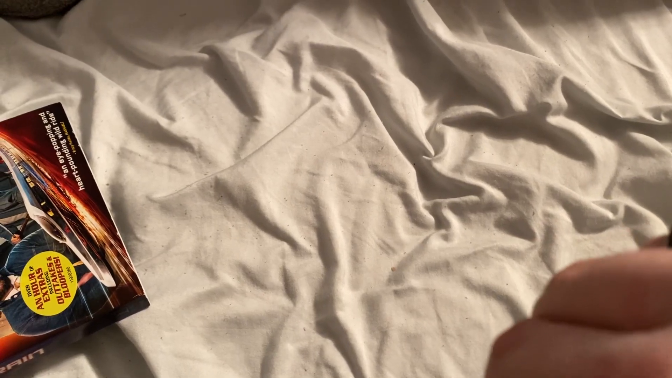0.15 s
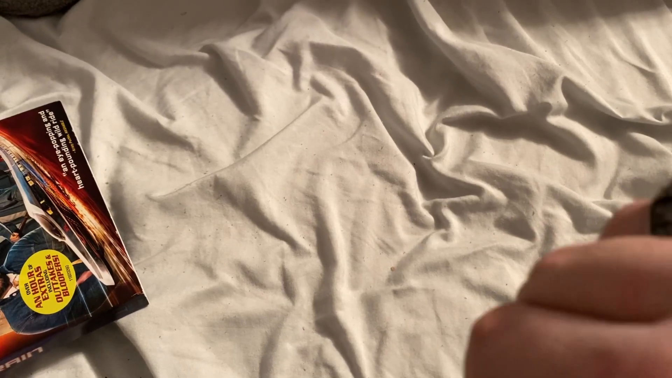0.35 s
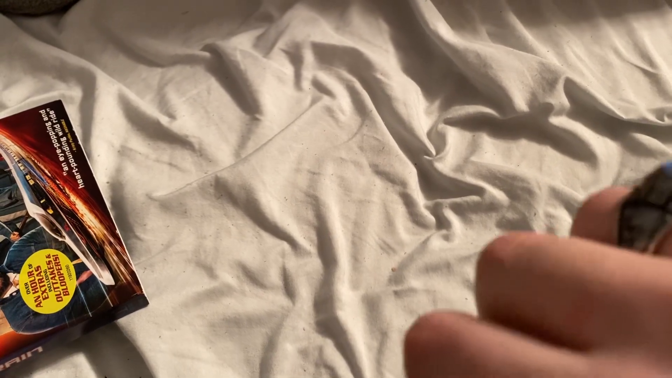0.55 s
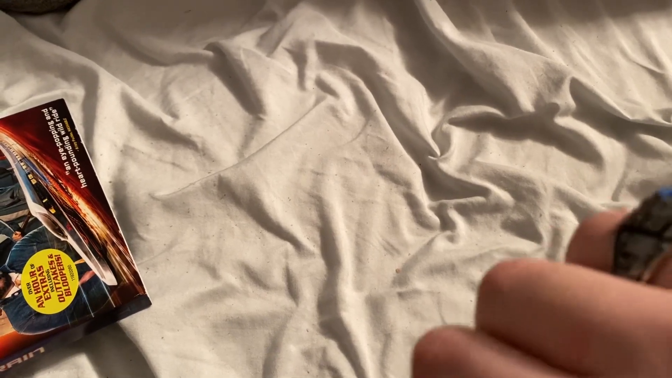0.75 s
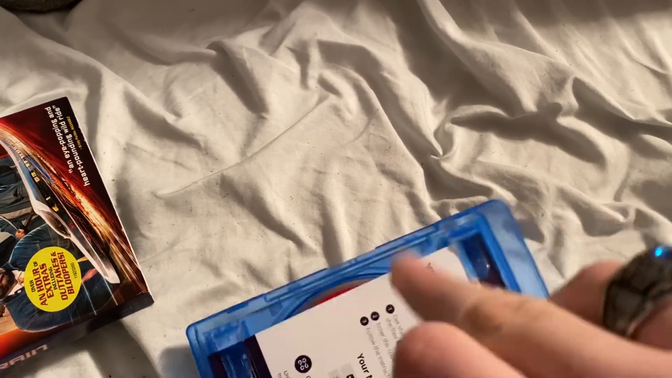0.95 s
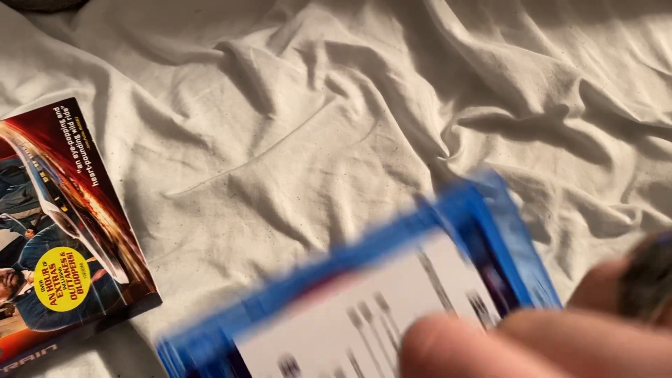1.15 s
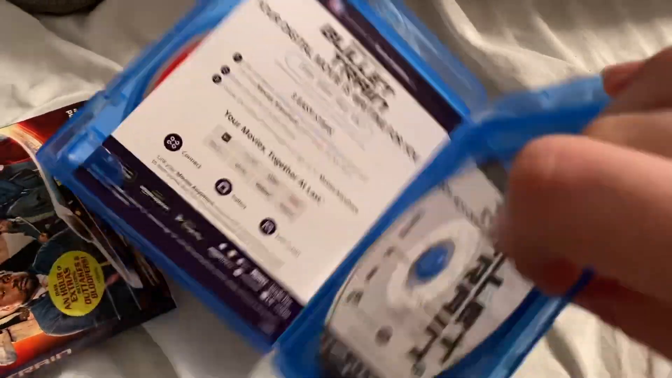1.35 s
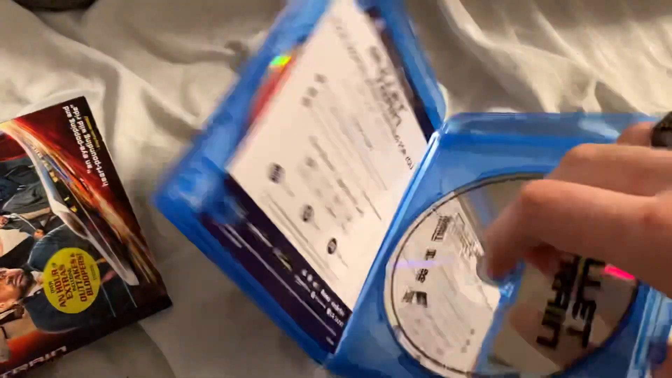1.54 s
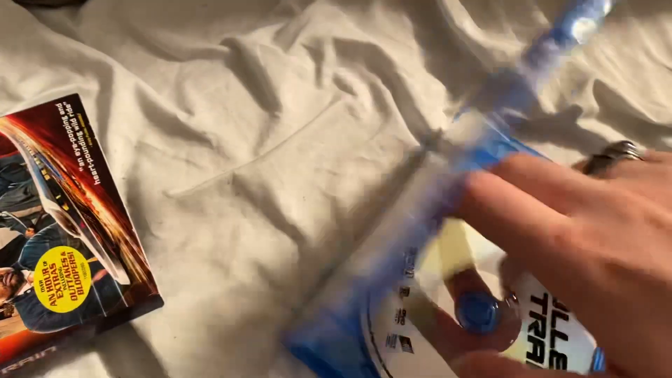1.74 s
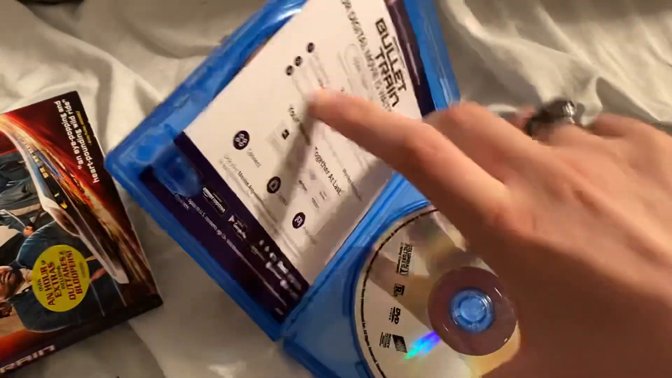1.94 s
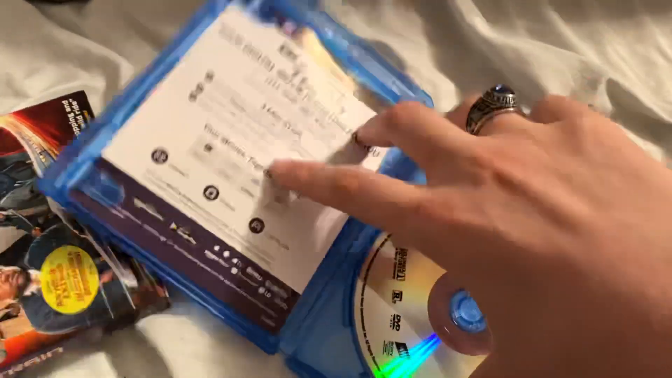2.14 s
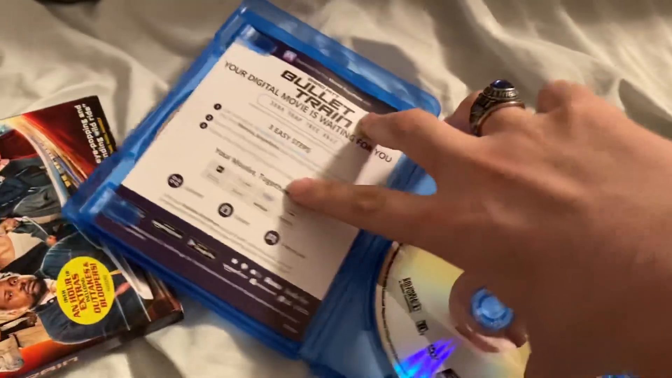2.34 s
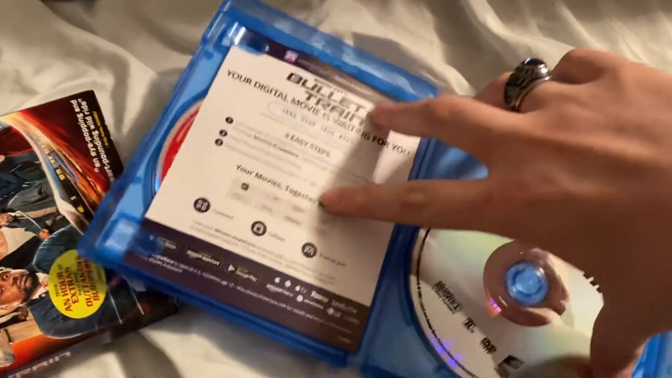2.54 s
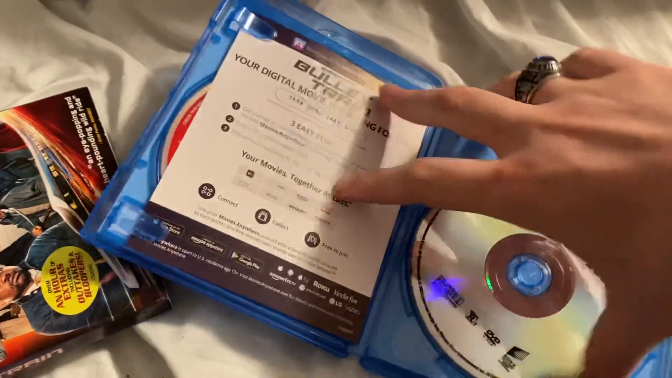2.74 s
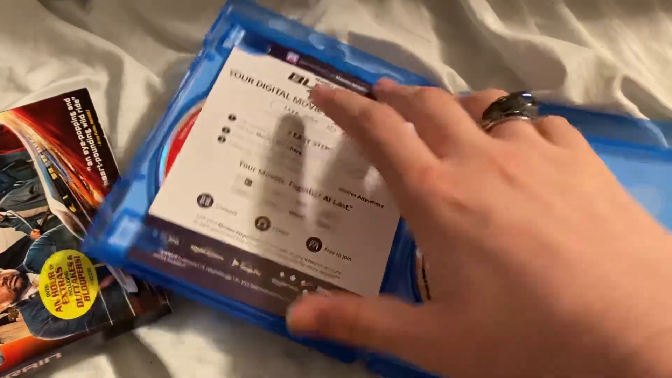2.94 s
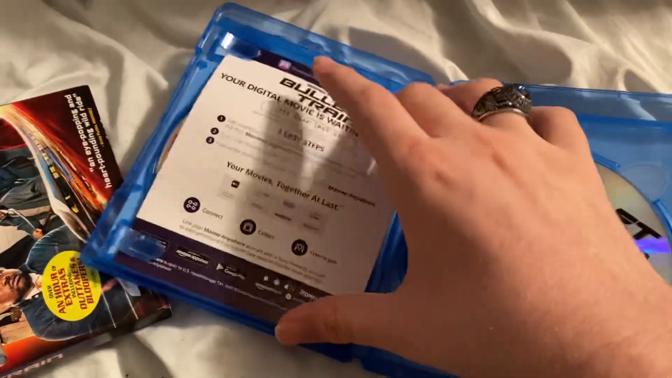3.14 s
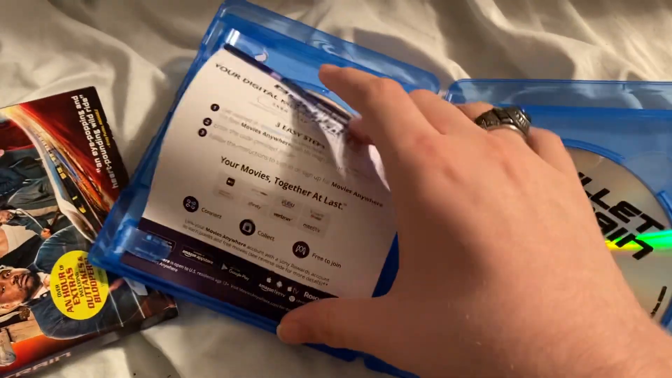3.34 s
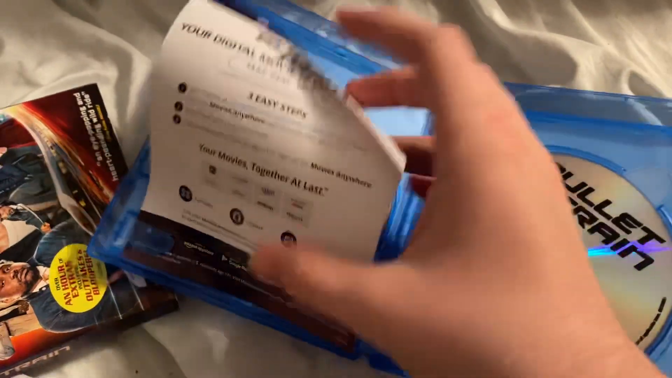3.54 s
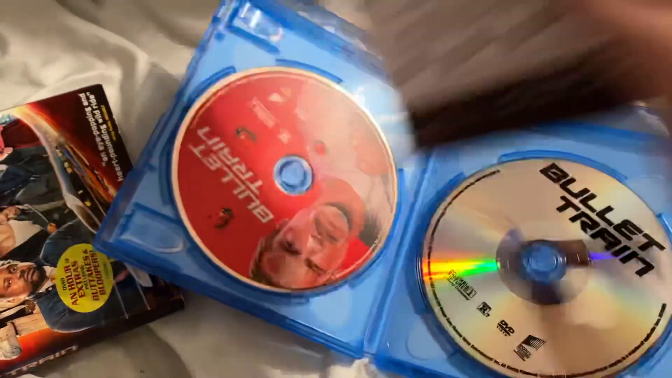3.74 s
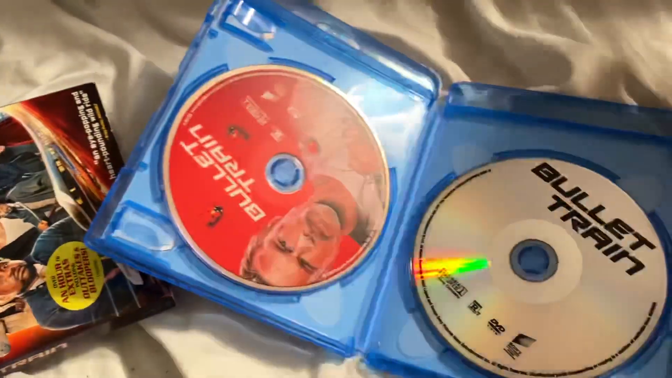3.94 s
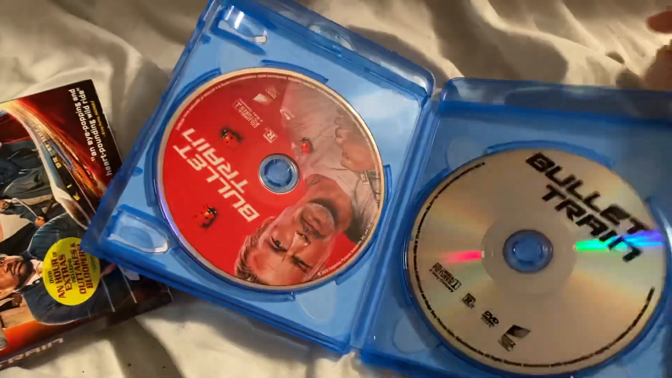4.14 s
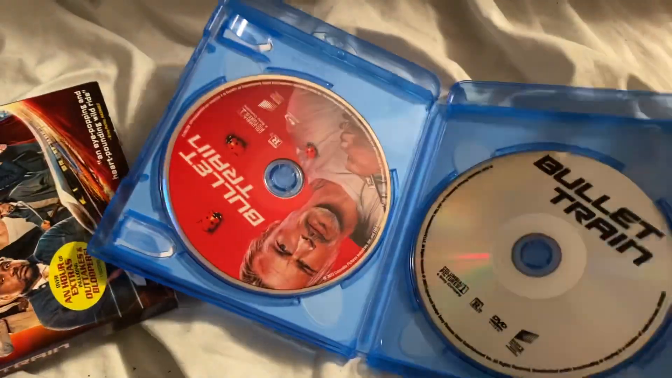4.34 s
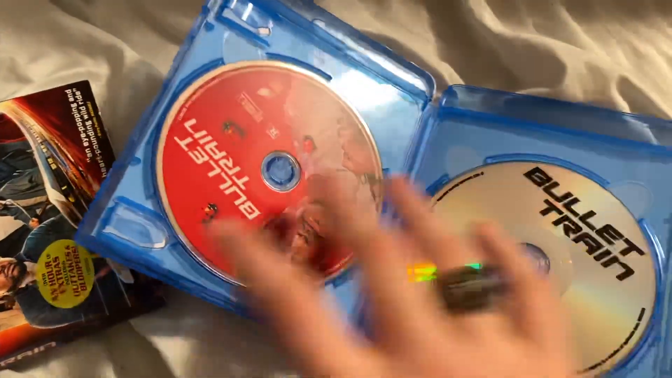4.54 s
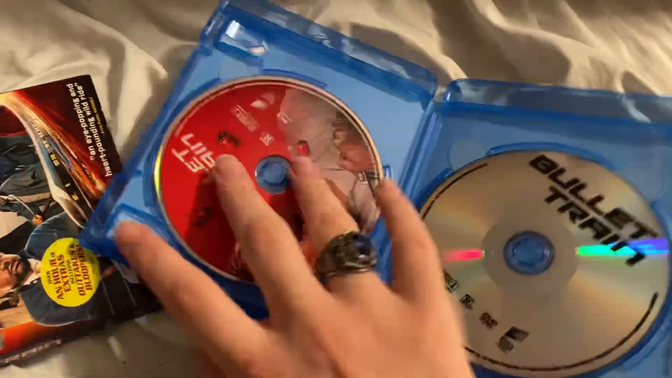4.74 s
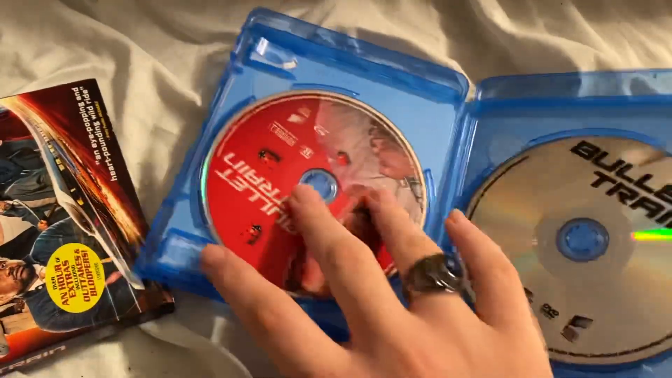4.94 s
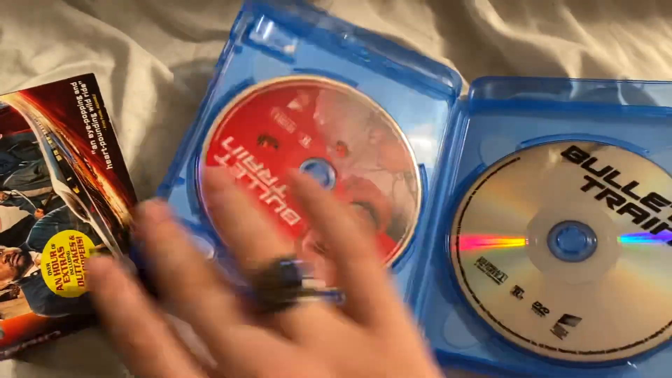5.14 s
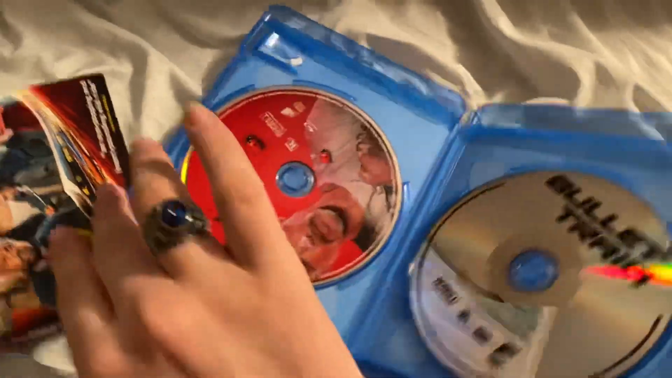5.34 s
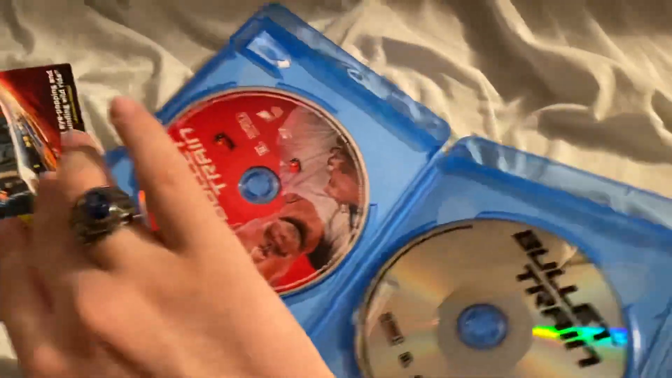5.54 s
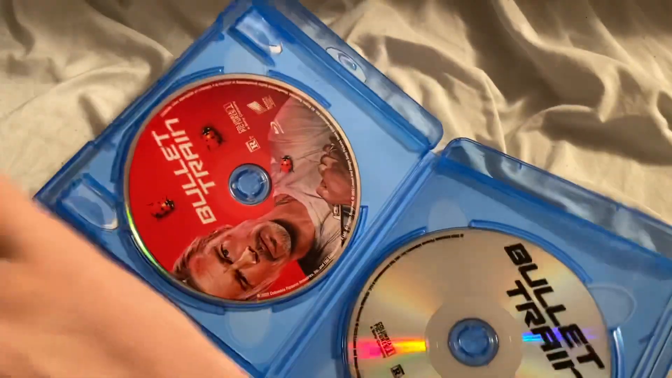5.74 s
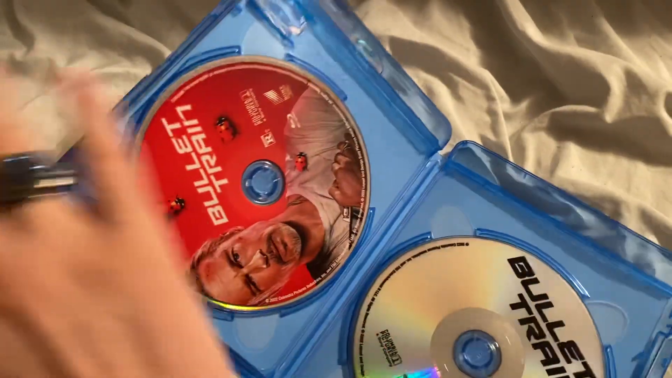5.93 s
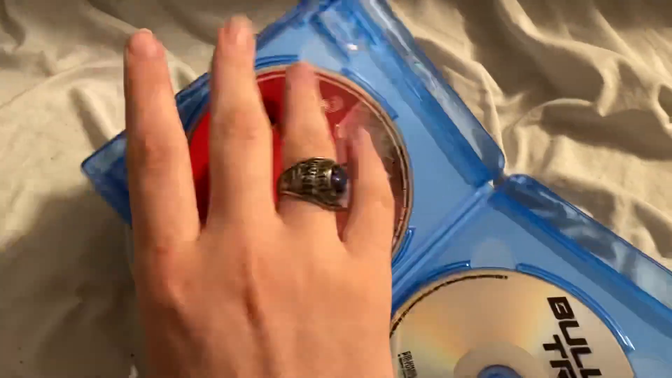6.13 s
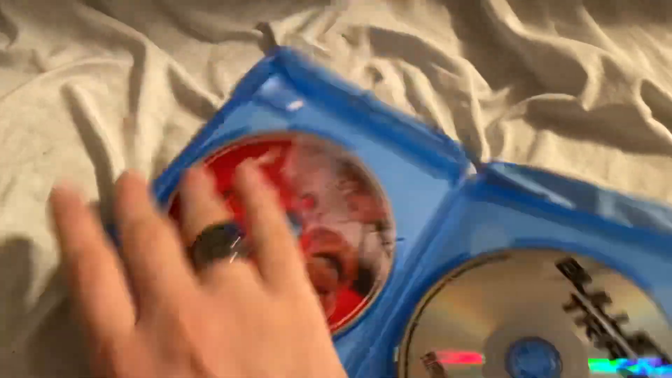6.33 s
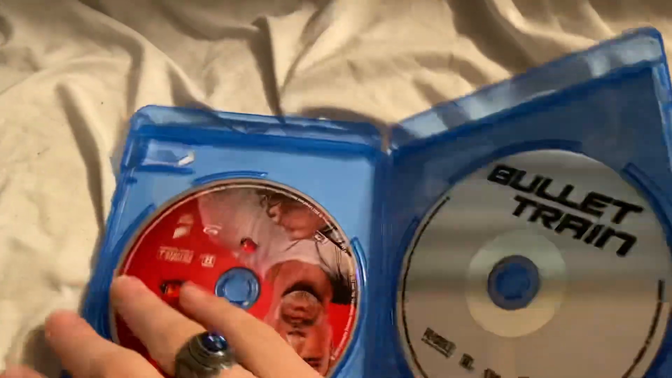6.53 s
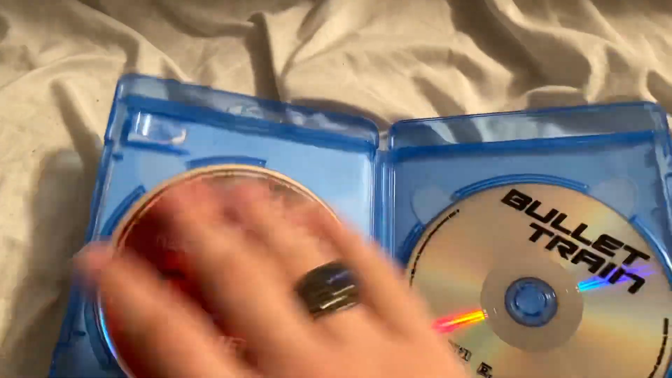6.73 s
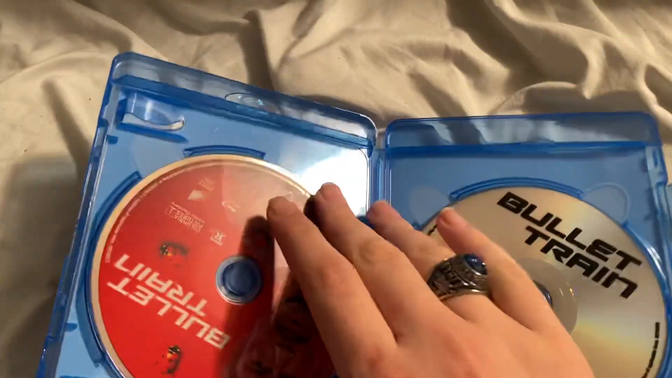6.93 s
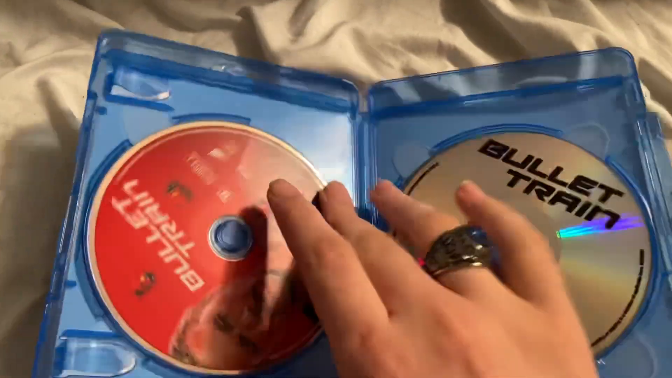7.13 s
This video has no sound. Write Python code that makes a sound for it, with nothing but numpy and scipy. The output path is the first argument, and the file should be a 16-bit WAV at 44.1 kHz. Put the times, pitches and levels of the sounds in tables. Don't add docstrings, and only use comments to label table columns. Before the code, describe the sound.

A thin plastic disc case cracks open sharply, clicks and knocks in the hands, then a stiff paper slip snaps free loudly before soft handling on bedding.

```python
import sys
import numpy as np
from scipy import signal
from scipy.fft import rfft, irfft, next_fast_len
from scipy.io import wavfile
from scipy.ndimage import uniform_filter1d

SR = 44100
rng = np.random.default_rng(int(sys.argv[2]) if len(sys.argv) > 2 else 0)


def how_loud(loudness_db):
    steps = np.asarray(loudness_db, float) / 20
    return 10 ** steps


def dump_mix(stems):
    frames = np.atleast_2d(stems).T
    limited = np.clip(frames, -1, 1)
    pcm = np.round(limited * 32767).astype(np.int16)
    wavfile.write(sys.argv[1], SR, pcm)


N = 316638
LEAD_S = 0.01

# peak t/s, level/dB, rise/s, fall/s
SHELL_STROKES = [(.15, -88, 0.43, 0.63), (2.5, -72, 0.36, 0.1), (.504, -71.5, 0.043, 0.17),
                 (.673, -75.5, 0.072, 0.34), (1.14, -71, 0.2, 0.77), (1.457, -59.5, 0.041, 0.036),
                 (1.6, -60.5, 0.059, 0.88), (1.9, -55.5, 0.1, 0.32), (2.2, -64.5, 0.23, 0.28),
                 (2.79, -70.5, 0.23, 0.61), (3.028, -68, 0.1, 0.069), (3.243, -57.5, 0.11, 0.15),
                 (3.42, -60, .12, 0.24), (3.908, -54.5, 0.0089, .05), (3.95, -97, 0.85, 0.19),
                 (3.985, -53, 0.011, 0.047), (4.128, -59, 0.067, 0.074), (4.39, -72.5, 0.17, 0.2),
                 (4.75, -66.5, 0.18, 0.68), (5.19, -62.5, 0.17, 0.43), (5.77, -68.5, 1, 0.18),
                 (6.024, -73.5, 0.074, 0.11), (6.23, -63.5, 0.47, 0.095), (6.453, -61, 0.28, 0.1),
                 (7.012, -69.5, 1, 0.33)]


def evened(x):
    return x / np.sqrt(np.mean(x ** 2) + 1e-20)


def loudest(x, size):
    return x / np.sqrt(uniform_filter1d(x ** 2, size).max() + 1e-20)


def read(points, hz):
    f, value = np.transpose(points)
    return np.interp(np.log(hz + 1), np.log(f + 1), value)


def along(table, column):
    return np.interp(np.arange(N) / SR, [row[0] for row in table], [row[column] for row in table])


def add(mix, at, sound):
    part = mix[max(at, 0):][:len(sound)]
    part += sound[:len(part)]


def ring(modes, t, spread, chance):
    detune = 1 + spread * chance[:8]
    weight_db = 3 * chance[8:]
    total = 0
    for k, (hz, db, t60) in enumerate(modes):
        decay = how_loud(db + weight_db[k] - 60 * t / t60)
        total = total + decay * np.sin(2 * np.pi * hz * detune[k] * t)
    return total


def crack(row, lid, thump_db, tick_db, shell_db, chance, grit):
    # f/Hz, level/dB, t60/s
    shell_modes = [(720, -14, 0.012), (950, 1.5, 0.031), (1270, -2, 0.0042), (1550, -9.5, 0.004),
                   (2250, -5.5, 0.0058), (2700, -2.5, .008), (3600, -1, .008), (4780, -6, 0.0073)]
    s, level_db, hz, ms = row
    t = np.arange(6000) / SR
    peak_at = round(LEAD_S * SR)

    since = (t[:len(grit)] - LEAD_S) / (max(ms, 0.6) / 1000)
    swell = np.exp(-(since / 0.4) ** 2)
    fade = np.exp(-np.maximum(since, 0) / 0.85)
    uneven = how_loud(3 * np.sqrt(12) * uniform_filter1d(grit[::-1], 12))
    burst = np.where(since < 0, swell, fade) * grit * uneven

    spot_band = signal.butter(2, [hz / 1.8, min(hz * 1.7, 9000)], "band", fs=SR)
    spot = signal.lfilter(*spot_band, burst)
    shell = signal.fftconvolve(burst, ring(shell_modes, t[:1000], 0.15, chance))[:len(grit)]
    body = loudest(spot, size=66) + how_loud(shell_db) * loudest(shell, size=66)

    tick = signal.lfilter(*signal.butter(1, [3800, 7000], "band", fs=SR), np.diff(burst))
    tick = tick - 0.54 * (tick - uniform_filter1d(tick, size=2))
    tick_db = tick_db + 6.5 * np.log2(hz / 1000)

    thump = ring(lid, t, 0.17, chance[::-1]) * (1 - np.exp(-t / 0.0039))
    sound = np.zeros(len(t) + peak_at)
    add(sound, peak_at, how_loud(thump_db - 5.0) * loudest(thump, size=300))
    add(sound, 0, how_loud(-1.04) * loudest(body, size=66))
    add(sound, 0, how_loud(tick_db) * loudest(tick, size=66))
    return how_loud(level_db) * sound


def struck(events, thump_db, tick_db, sway_db, shell_db):
    # f/Hz, level/dB, t60/s
    lid_modes = [(65, -14, 0.1), (135.6, -7, 0.057), (227, -6, 0.038), (320, -0.5, 0.029),
                 (525.7, -8, 0.044)]
    hz, db, t60 = lid_modes[0]
    lid = [(hz, db + sway_db, t60)] + list(lid_modes[1:])
    out = np.zeros(N)
    for row, draw in zip(events, rng.standard_normal((30, 2416))):
        sound = crack(row, lid, thump_db, tick_db, shell_db, draw[:16], draw[16:])
        add(out, round((row[0] - LEAD_S) * SR), sound)
    return out


def shell_cracks():
    # t/s, level/dB, centre f/Hz, length/ms
    crack_events = [(.229, -17, 1360, 4.5), (.8456, -41.5, 970, 18), (.8698, -16.5, 1840, 2.4),
                    (.8822, -18, 950, 4.4), (.9693, -42, 2300, 2.1), (1.1306, -48, 2200, 1.9),
                    (1.4432, -36.5, 1900, 5.2), (1.4878, -35, 1290, 3.6), (1.5326, -32.5, 990, 6.1),
                    (1.6162, -33.5, 1400, 5.5), (1.7039, -26, 2600, 10), (1.7105, -21, 2530, 4.5),
                    (2.0476, -38, 1800, 3.9), (2.7967, -44.5, 1950, 3.8), (3.149, -44.5, 3670, 2.9),
                    (4.1052, -39.5, 1870, 3.4), (5.1513, -45.5, 960, 3.67), (5.4268, -39, 1710, 1.2),
                    (6.1182, -34.5, 3600, 0.76), (6.1717, -39.5, 810, 3.5), (6.1795, -38, 1270, 10),
                    (6.2117, -39, 1960, 4.1), (.937, -43.5, 4500, 1.5), (.955, -48, 5530, 1.9),
                    (.99, -58, 6000, 1.6), (1.066, -61, 5000, 1.4), (2.812, -48, 3000, 1.5),
                    (.752, -64, 990, 2.6)]
    return struck(crack_events, thump_db=-5, tick_db=-11, sway_db=-2.6, shell_db=-2)


def lid_knocks():
    # t/s, level/dB, centre f/Hz, length/ms
    knock_events = [(.8908, -28.5, 1520, 3.9), (.9009, -30, 1550, 21), (1.893, -57.5, 1340, 3.26),
                    (1.9262, -41, 1030, 8.1), (1.9917, -41, 990, 3.7), (2.1699, -37, 1430, 4.1),
                    (2.2843, -51, 2010, 4.2), (2.4553, -51, 2230, 1.9), (2.8237, -49, 1310, 5.2),
                    (2.9205, -45, 1070, 3.2), (2.9849, -34.5, 1210, 13), (2.9933, -36.5, 1210, 5.4),
                    (3.0224, -40.5, 2460, 2.3), (4.6192, -52, 3040, 5.4), (6.4563, -37, 695, 1.3)]
    return struck(knock_events, thump_db=3.2, tick_db=-6.5, sway_db=1.5, shell_db=0)


def edge_clicks():
    # t/s, level/dB, centre f/Hz, length/ms
    click_events = [(.6147, -55.5, 1310, 0.95), (.6598, -51.5, 1380, 2.9), (.9239, -29, 1370, 3.6),
                    (1.1424, -42.5, 1470, 15), (1.3168, -52.5, 1550, 6.7), (1.5147, -36.5, 1800, 11),
                    (1.9456, -37, 2850, 4.8), (2.2102, -45, 3380, 2.4), (2.584, -59, 803, 5.7),
                    (2.88, -28, 2476, 2.8), (2.8966, -39, 2410, 3.7), (3.9649, -36, 3040, 8.2),
                    (4.0133, -31.5, 1830, 1.5), (4.1458, -46.5, 1970, 3.8), (4.6383, -46, 1004, 10.4),
                    (5.6508, -50, 1120, 7.4), (6.137, -49, 1530, 5.2), (6.261, -72, 3460, 3.4),
                    (6.6356, -49, 1340, 5.1), (6.8114, -34.5, 1830, 4), (1.176, -44.5, 1920, 1.2),
                    (2.643, -53.5, 2520, 3.1), (2.76, -55, 1800, 2), (4.133, -52.5, 1500, 4.8),
                    (6.573, -56.5, 1213, 1.9), (6.982, -50, 1454, 3), (7.091, -49.5, 2210, 1.4),
                    (7.152, -48, 2220, 1.2), (1.641, -44, 700, 4), (2.181, -37, 3980, 2.5)]
    return struck(click_events, thump_db=-8.5, tick_db=-12, sway_db=-1.8, shell_db=-2)


def clip_snaps():
    # t/s, level/dB, centre f/Hz, length/ms
    snap_events = [(.2245, -32, 3500, 1.2), (1.5031, -36, 2440, 4), (1.8282, -37.5, 2570, 6.3),
                   (1.8451, -35.5, 2530, 6.7), (1.9598, -36, 2590, 3.2), (2.2156, -34, 3600, 4.5),
                   (3.0976, -56.5, 3950, 2.2), (3.1771, -44.5, 4460, 8.1), (3.2377, -48, 2780, 4.3),
                   (3.304, -36, 3600, 4), (3.3258, -34.5, 3000, 2.8), (3.3393, -31, 1248, 5.5),
                   (3.4005, -54, 4330, 4.3), (3.6372, -26, 4810, 4), (2.504, -63, 6000, 4),
                   (2.611, -60.5, 6500, 1.5), (2.662, -58, 4800, 2), (2.796, -77, 6500, 5),
                   (3.097, -43.5, 6500, 1.5), (3.647, -31.5, 4900, 2), (3.6585, -42, 6500, 1),
                   (3.6715, -34.5, 6500, 1), (3.678, -39, 6500, 1), (3.919, -50.5, 6000, 1.5),
                   (4.012, -48.5, 5000, 2), (4.033, -60.5, 4500, 2), (4.114, -65.5, 6000, 2),
                   (4.636, -47.5, 4470, 3), (5.597, -51.5, 4200, 4), (3.6335, -36.5, 4120, 3)]
    return struck(snap_events, thump_db=-18, tick_db=-9.5, sway_db=0.5, shell_db=-3.5)


def paper_flaps():
    # t/s, level/dB, centre f/Hz, length/ms
    flap_events = [(3.203, -28.5, 1598, 6.7), (3.4419, -25, 2600, 3), (3.6504, -14.5, 1900, 2.4),
                   (3.6558, -11.5, 3300, 2.8), (3.6605, -9, 2088, 3.3), (3.669, -13, 2780, 2.9),
                   (3.6816, -18.5, 1050, 0.51), (3.6907, -32.5, 1003, 3.2), (3.7024, -29, 990, 16),
                   (3.909, -32.5, 1930, 4.9), (3.9194, -28.5, 1540, 8.9), (3.9297, -25.5, 1540, 9.7),
                   (3.935, -40, 1300, 4.1)]
    return struck(flap_events, thump_db=-14.5, tick_db=-21.5, sway_db=-7, shell_db=-7)


def soft_thuds():
    # t/s, level/dB, centre f/Hz, length/ms
    thud_events = [(3.9907, -35.5, 1460, 3.4), (4.0035, -30.5, 879, 18), (4.0224, -27.5, 1550, 7),
                   (4.0331, -31, 1400, 6.7), (4.1971, -44, 1168, 2.3), (4.6925, -36, 1720, 5),
                   (5.1744, -37, 1360, 3.5), (5.2095, -43.5, 1170, 0.92), (5.5964, -43, 1135, 12),
                   (5.971, -43, 1420, 9.5), (5.9941, -36, 1260, 30)]
    return struck(thud_events, thump_db=0.62, tick_db=-21, sway_db=2.6, shell_db=-1)


def case():
    # delay t/s, level/dB
    near_echo = [(0.001, -20), (0.00016, -24.5)]
    direct = shell_cracks() + lid_knocks() + edge_clicks() + clip_snaps() + paper_flaps() + soft_thuds()
    out = np.array([direct, direct])
    for port, (s, db) in zip(out, near_echo):
        add(port, round(s * SR), how_loud(db) * direct)
    return out


def rings():
    # t/s, level/dB, f/Hz, t60/s
    ring_events = [(.228, -20, 980, 0.014), (.232, -35.5, 396, 0.042), (.236, -32.5, 62.2, 0.23),
                   (0.872, -28, 1440, .02), (0.883, -19.5, 867, 0.014), (.886, -17.5, 169, 0.041),
                   (1.709, -25.5, 203.6, 0.049), (1.892, -36, 275, 0.054), (1.927, -39.5, 320, 0.027),
                   (1.992, -42, 254, 0.038), (2.178, -42.5, 117.4, 0.15), (2.585, -51, 765, 0.019),
                   (2.995, -33, 59.7, 0.18), (3.34, -38.5, 1325, 0.04), (3.441, -25.5, 1270, 0.021),
                   (3.648, -21.5, 1240, 0.025), (3.654, -14.5, 3460, 0.014), (3.658, -15, 1477, 0.037),
                   (3.665, -18.5, 2700, 0.027), (3.668, -20.5, 2500, .02), (3.682, -32, 890, 0.068),
                   (3.912, -40, 2300, 0.035), (3.928, -31, 1000, 0.05), (3.964, -36, 2700, 0.032),
                   (3.983, -38, 2250, 0.062), (4.011, -33.5, 2330, 0.061), (4.019, -29.5, 4000, 0.018),
                   (4.0, -29, 105, .05), (4.018, -40, 61, 0.15), (4.05, -40.5, 61, 0.2),
                   (4.105, -38, 3600, 0.012), (4.133, -56.5, 3600, 0.014), (4.147, -50.5, 3600, 0.023),
                   (4.196, -55, 2950, 0.028), (4.8, -35.5, 149, 0.03), (5.176, -47, 2870, 0.015),
                   (5.595, -47, 1150, 0.027), (5.65, -48, 810, 0.02), (5.972, -45, 955, 0.037),
                   (5.99, -46, 3670, 0.059), (5.996, -47, 65, 0.31), (6.117, -39.5, 3600, 0.013),
                   (6.18, -50, 1966, 0.069), (6.211, -45, 3600, 0.021), (6.236, -54, 3600, 0.015),
                   (6.259, -58, 3600, 0.017), (6.457, -36, 630, 0.021), (6.813, -38, 1400, 0.0095)]
    rise_cycles, pair_gap = 0.46, 0.069
    out, t = np.zeros(N), np.arange(SR // 4) / SR
    for (s, db, hz, t60), (apart, turn) in zip(ring_events, rng.random((60, 2))):
        neighbour_hz = hz * (1 + pair_gap * (1 + apart))
        pair = np.sin(2 * np.pi * hz * t) + 0.5 * np.sin(2 * np.pi * (neighbour_hz * t + turn))
        rise = 1 - np.exp(-t * hz / rise_cycles)
        add(out, round(s * SR), how_loud(db - 60 * t / t60) * rise * pair * 2)
    return out


def ticks():
    # t/s, level/dB, centre f/Hz, length/ms
    tick_events = [(0.2226, -27, 11000, 1.4), (.409, -56.5, 1300, 3.5), (1.011, -55, 4920, 1.5),
                   (1.041, -52.5, 600, 2.7), (1.071, -52.5, 800, 7), (1.213, -62, 8850, 1.5),
                   (1.457, -42, 870, 3.6), (2.207, -33, 4920, 4.9), (2.225, -32, 4940, 1.9),
                   (2.794, -40.5, 11400, 4.8), (3.124, -44, 7000, 1.7), (3.141, -40, 3320, 2),
                   (3.4392, -24.5, 1360, 11), (3.538, -58, 900, 4), (3.401, -50, 3000, 3),
                   (3.664, -7.5, 3000, 0.87), (3.806, -44, 280, 12), (3.3015, -36.5, 6000, 3),
                   (3.864, -52, 9000, 4), (4.105, -46, 598, 6.8), (5.4258, -41, 10100, 1.5),
                   (5.988, -43.5, 3040, 2.4), (6.166, -48, 7000, 1.3), (6.173, -56, 9000, 1.2),
                   (6.178, -41.5, 9000, 0.86), (6.193, -48.5, 4440, 4.3), (6.947, -63.5, 496, 3.7)]
    span = 1.5
    out, t = np.zeros(N), np.arange(2000) / SR
    for (s, db, hz, ms), grit in zip(tick_events, rng.standard_normal((30, len(t)))):
        band = signal.butter(2, [hz / span, min(hz * span, SR / 3)], "band", fs=SR)
        puff = signal.lfilter(*band, grit * np.exp(-t * 1000 / ms))
        add(out, round(s * SR), how_loud(db) * loudest(puff, size=66))
    return out


def drags():
    # start t/s, length/s, level/dB, f/Hz
    drag_events = [
        (0.452, 0.26, -64.5, 1106),
        (0.453, .25, -72.5, 4550),
        (3.374, 0.04, -45.5, 5600),
    ]
    q, edge_s = 7, 0.028
    out, t = np.zeros(N), np.arange(N) / SR
    for s, length, db, hz in drag_events:
        band = signal.butter(1, [hz * (1 - 0.5 / q), hz * (1 + 0.5 / q)], "band", fs=SR)
        held = np.clip(np.minimum(2 * (t - s), s + length - t) / edge_s + 0.5, 0, 1)
        out += evened(signal.lfilter(*band, rng.standard_normal(N))) * how_loud(db) * held
    return out


def strokes(rows):
    fade_db, bend, still_db = 23, 1.74, -100
    t = np.arange(0, N + 64, 64) / SR
    power = how_loud(still_db) ** 2
    for s, db, rise, fall in rows:
        away = np.where(t < s, (s - t) / max(rise, 0.01), (t - s) / max(fall, 0.01))
        power = power + how_loud(db - fade_db * away ** bend) ** 2
    return np.interp(np.arange(N) / SR, t, 10 * np.log10(power))


def friction(spectrum, level_db, per_s, size_db, smooth, patchy_db, flicker_db):
    # f/Hz, likeness (0 to 1)
    likeness = [(60, 0.77), (180, 0.85), (550, 0.75), (1650, 1), (4970, 0.59), (15000, 0.78)]
    sizes = how_loud(size_db * np.minimum(rng.exponential(1, N), 5))
    slips = sizes * (rng.random(N) < per_s / SR)
    noise = (evened(slips) + smooth) * rng.standard_normal((2, N))
    hz, t, z = signal.stft(noise, SR, nperseg=256, noverlap=128)
    same = np.clip(read(likeness, hz), 0, 1)[:, None]
    z[1] = same * z[0] + np.sqrt(1 - same ** 2) * z[1]

    patches = uniform_filter1d(rng.standard_normal(z[0].shape), 4, axis=0)
    patches = evened(uniform_filter1d(patches, 12, axis=1))
    jerks = evened(uniform_filter1d(rng.standard_normal(len(t)), 6))
    z *= how_loud(read(spectrum, hz)[:, None] + patchy_db * patches + flicker_db * jerks)
    rubbed = signal.istft(z, SR, nperseg=256, noverlap=128)[1][:, :N]
    return evened(rubbed) * how_loud(level_db)


def rustle():
    # f/Hz, level/dB per Hz
    paper_colour = [(3000, -22.5), (4500, -1), (6000, -5.5), (8000, -8), (11000, -9), (15500, -13.5)]
    finger_colour = [(1800, -18.5), (2500, 1), (4200, -4.5), (5500, -33)]
    shell_colour = [(300, -9.5), (650, 0.5), (1200, -2), (2200, -6.5), (3000, -30.5)]
    # peak t/s, level/dB, rise/s, fall/s
    paper_strokes = [(.21, -83.5, 0.19, 0.07), (.26, -68, .03, 0.17), (.51, -71.5, 0.11, 0.13),
                     (.673, -75.5, 0.071, 0.054), (1.13, -69, 0.34, 0.2), (1.457, -43.5, 0.032, 0.016),
                     (1.76, -70, 0.12, 0.25), (1.94, -50, 0.32, 0.14), (2.205, -54, 0.44, 0.071),
                     (2.4, -55, 0.18, 0.15), (2.52, -54, 0.038, 0.029), (2.6, -67, 0.12, 0.15),
                     (3.07, -50.5, 0.036, 0.022), (2.79, -66.5, 0.34, .2), (2.9, -56.5, 0.074, 0.018),
                     (3.01, -55.5, 0.091, 0.05), (3.168, -46, 0.069, 0.096), (3.33, -40, 0.086, 0.062),
                     (3.44, -39.5, 0.13, 0.05), (3.52, -58, 0.12, 0.4), (3.632, -35, 0.0081, 0.009),
                     (3.96, -51, 0.11, 0.032), (4.35, -60, 0.16, 0.27), (4.62, -59.5, 0.023, 0.3),
                     (4.82, -59.5, 0.34, 0.11), (4.95, -66, 0.13, 0.046), (5.16, -56, 0.032, 0.19),
                     (5.4, -62.5, 0.28, 0.17), (5.774, -57, 0.32, 0.11), (5.995, -51, 0.043, 0.08),
                     (6.453, -58.5, 0.3, 0.14), (7.0, -66.5, 0.8, 0.3)]
    finger_strokes = [(.15, -96, 0.37, 0.32), (1.16, -61.5, 0.094, 0.2), (1.76, -57, 0.35, 0.25),
                      (1.94, -56.5, 0.14, 0.24), (2.2, -67, 0.54, 0.61), (2.79, -73, 0.24, 0.15),
                      (3.028, -66, 0.28, 0.19), (3.168, -52.5, 0.053, 0.23), (3.33, -50, 0.078, 0.25),
                      (3.7, -58, 0.15, 0.076), (4.07, -63.5, 0.53, 0.12), (4.37, -64.5, 0.18, 0.19),
                      (4.8, -68.5, 0.27, 0.36), (5.2, -65.5, 0.1, 1), (5.774, -59, 0.27, 0.085),
                      (6.024, -61.5, 0.036, 0.03), (6.45, -66, 0.62, 0.22), (6.98, -72.5, 1, 0.29)]
    hiss = friction(paper_colour, strokes(paper_strokes) + 2.1, per_s=1000, size_db=2.0,
                    smooth=1.6, patchy_db=3.0, flicker_db=1.0)
    finger = friction(finger_colour, strokes(finger_strokes) + 5.3, per_s=3800, size_db=-0.5,
                      smooth=0.4, patchy_db=1.7, flicker_db=1.7)
    scrape = friction(shell_colour, strokes(SHELL_STROKES) + 6.4, per_s=3500, size_db=3.0,
                      smooth=1.5, patchy_db=2.0, flicker_db=1.5)
    return hiss + finger + scrape


def room(x):
    # f/Hz, t60/s
    decay_times = [(100, 0.44), (500, 0.29), (2000, 0.32), (6000, 0.26), (14000, 0.11)]
    taps = np.zeros((2, SR // 2))
    at = np.arange(100, SR // 2 - 20, 20)
    places = at + rng.integers(0, 20, (2, len(at)))
    np.put_along_axis(taps, places, rng.choice([-1., 1.], (2, len(at))), 1)
    hz, t, z = signal.stft(taps, SR, nperseg=256)
    decay = how_loud(-60 * t / read(decay_times, hz)[:, None])
    tail = signal.istft(z * decay, SR, nperseg=256)[1]
    return signal.fftconvolve(x.mean(0)[None], tail / np.linalg.norm(tail[0]), axes=1)[:, :N]


def coloured(spectrum, apart):
    size = next_fast_len(N)
    a, b = rng.standard_normal((2, size))
    pair = rfft(np.array([a + apart * b, a - apart * b]))
    gain = how_loud(read(spectrum, np.fft.rfftfreq(size, 1 / SR)))
    return evened(irfft(pair * gain, size)[:, :N])


def rumble():
    # f/Hz, level/dB per Hz
    cloth_colour = [(90, -27), (160, -5), (300, -4), (450, -10.5), (800, -33)]
    hand_colour = [(8.8, -55), (15, -19.5), (31, -2.5), (59, -2.5), (82, -3.5), (140, -13), (200, -39),
                   (260, -28.5), (440, -120)]
    # t/s, cloth swish level/dB, hand rumble level/dB
    push = [(0.0, -62, -60.5), (0.44, -64, -53), (0.76, -63.5, -57.5), (1.2, -61.5, -54),
            (1.5, -63.5, -57.5), (1.88, -63, -50), (2.5, -61, -59), (3.02, -59.5, -54.5), (3.44, -82, -56),
            (3.86, -49, -50.5), (4.2, -69, -54.5), (4.66, -61.5, -57), (4.8, -60, -53.5), (5.3, -59.5, -54),
            (5.88, -63, -53.5), (6.2, -59.5, -54), (6.6, -63.5, -59), (7.18, -62, -57)]
    jerks = uniform_filter1d(uniform_filter1d(rng.standard_normal(N), 500), 500)
    jerks_db = 2 * evened(jerks)
    stroke_db = 0.64 * (strokes(SHELL_STROKES) + 62)
    cloth_db = along(push, column=1) + 3.0 + jerks_db + stroke_db
    swish = coloured(cloth_colour, apart=0.064) * how_loud(cloth_db)
    return swish + coloured(hand_colour, apart=0.15) * how_loud(along(push, column=2) + 0.44)


def scene():
    cracks, ringing = case(), rings()
    echo = room(cracks + ringing)
    return cracks + ringing + how_loud(-14.5) * echo + rustle() + rumble() + drags() + ticks()


def band_limit(x):
    return signal.sosfilt(signal.butter(12, 16990, fs=SR, output="sos"), x)


def record(dry):
    # f/Hz, level/dB
    port_colour = [(15, -13), (45, -1), (7000, -1.5), (12000, -7), (16000, -9.5)]
    # f/Hz, level/dB; then f/Hz, phase/rad
    right_db = [(100, 0), (1000, -2), (1700, -1), (2400, -6), (3800, -7), (5500, -6), (6400, -1)]
    right_phase = [(100, 0.33), (350, 0.72), (1000, -0.62), (1800, -1.82), (2500, -1.33), (3600, -0.87),
                   (6400, 1.5)]
    mono_hz, flip_hz, top_hz = 6300, 2090, 15750
    size = next_fast_len(N)
    hz = np.fft.rfftfreq(size, 1 / SR)
    left, right = rfft(dry, size) * how_loud(read(port_colour, hz)) / (1 + (hz / top_hz) ** 80)
    right = right * how_loud(read(right_db, hz)) * np.exp(1j * read(right_phase, hz))

    turn = np.pi * np.maximum(hz - 6900, 0) / flip_hz
    turn = turn - 0.5 * np.sin(2 * turn)
    shared = np.clip((hz - mono_hz) / 500, 0, 1) * 0.98
    own = np.sqrt(1 - shared ** 2) * right * how_loud(-7 * shared)
    right = shared * left * np.exp(1j * turn) + own
    mix = np.tanh(irfft(np.array([left, right]), size)[:, :N])
    return band_limit(mix)


dry = scene()
out = record(dry)
dump_mix(out)
```